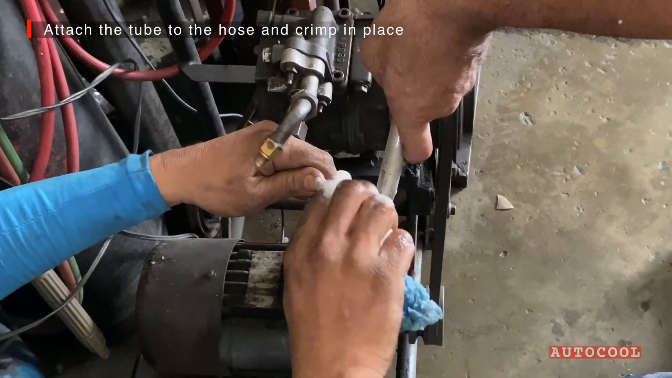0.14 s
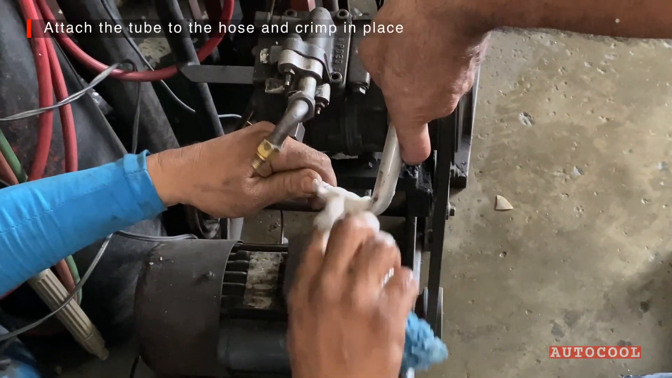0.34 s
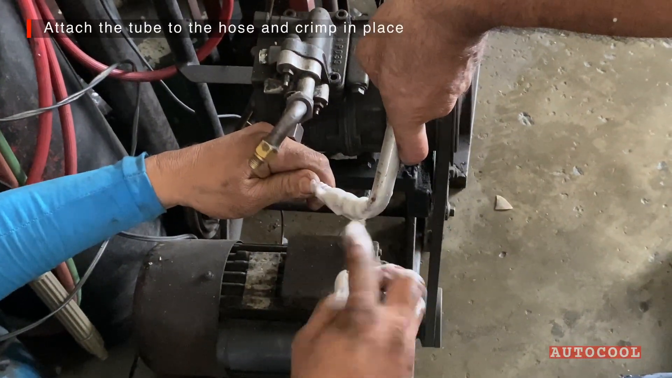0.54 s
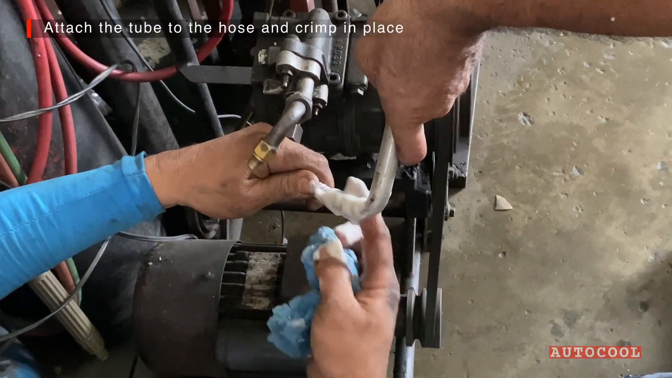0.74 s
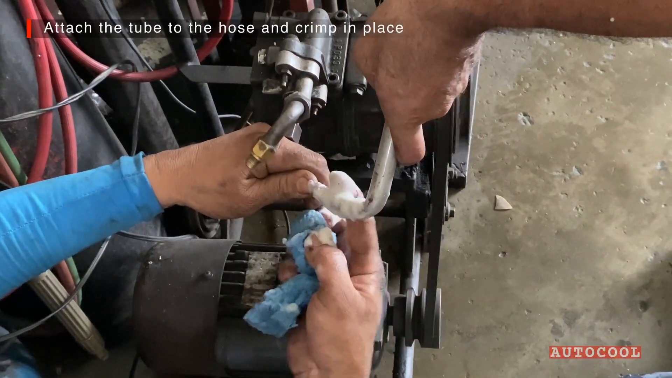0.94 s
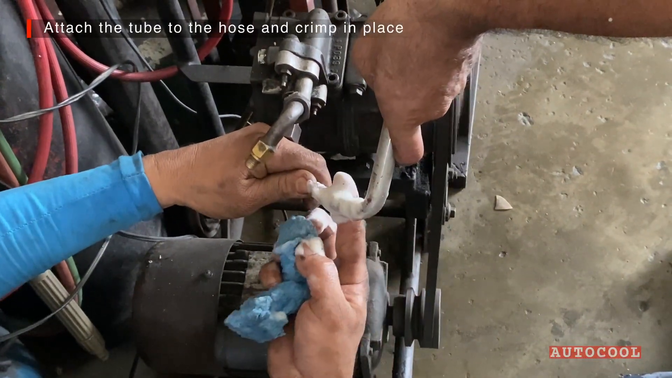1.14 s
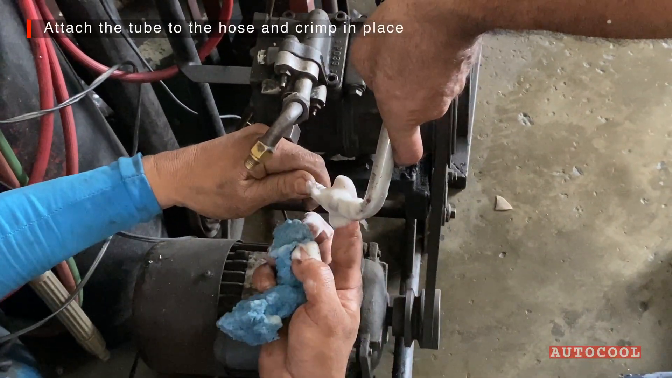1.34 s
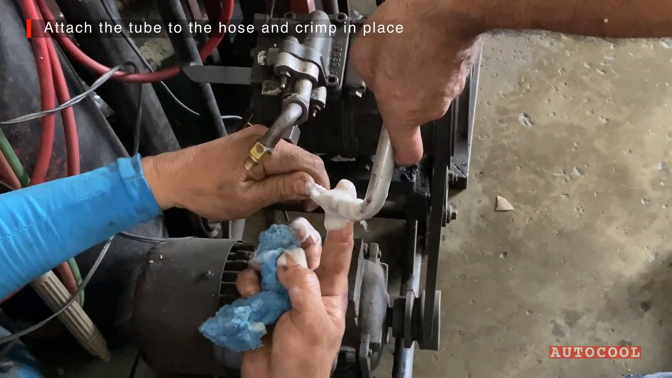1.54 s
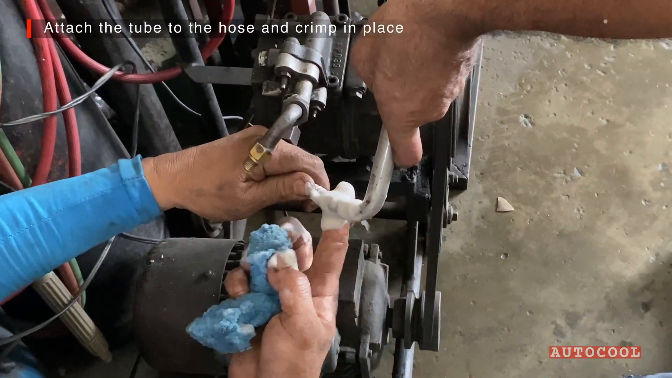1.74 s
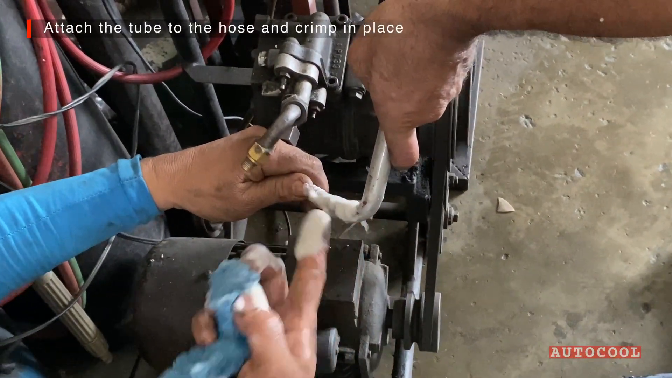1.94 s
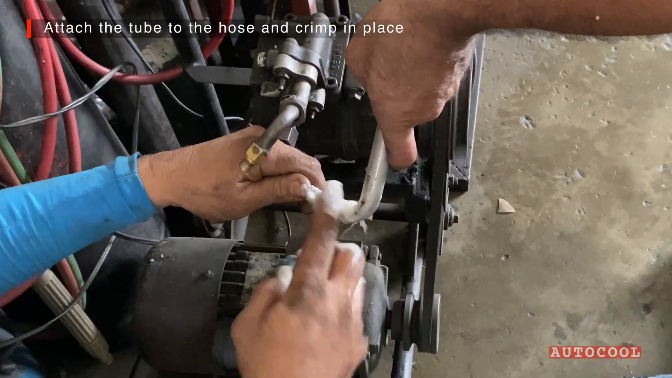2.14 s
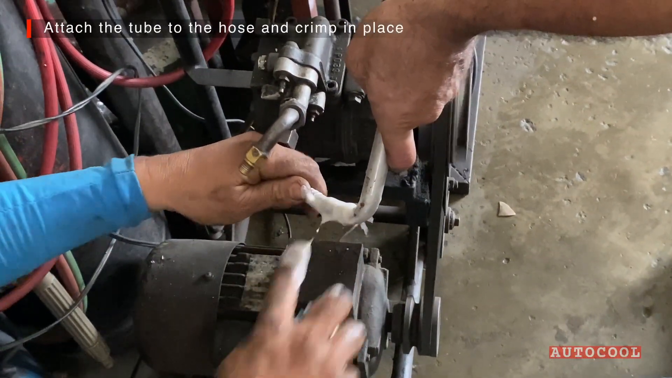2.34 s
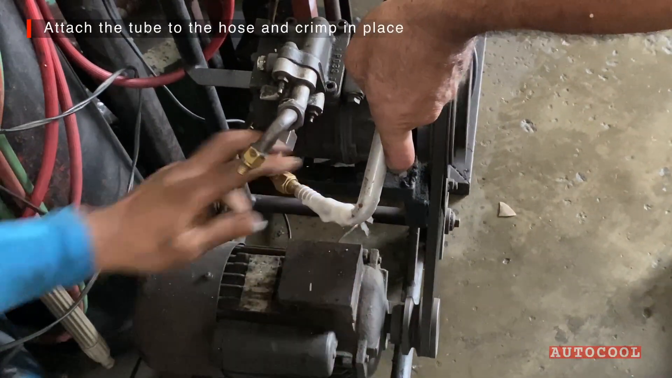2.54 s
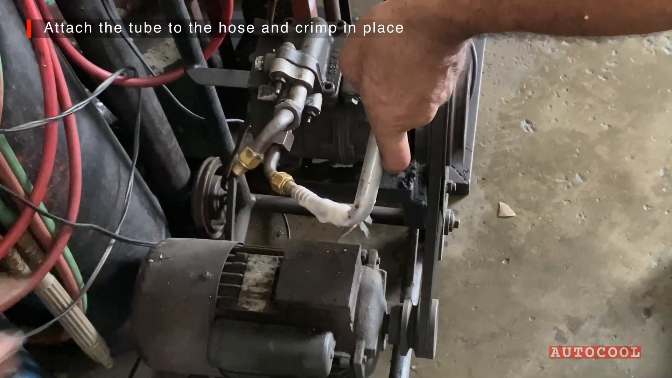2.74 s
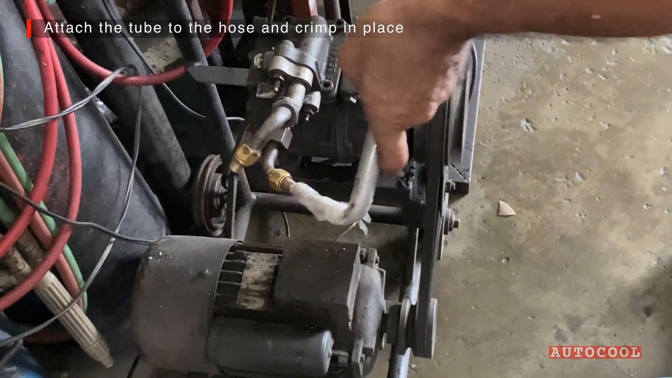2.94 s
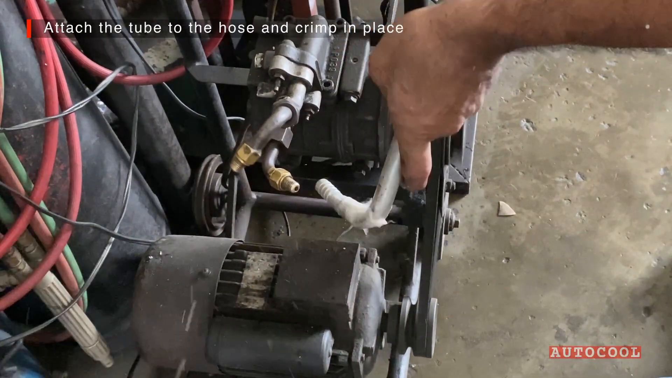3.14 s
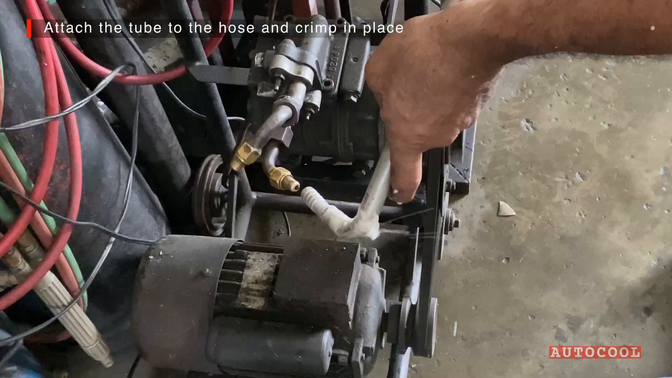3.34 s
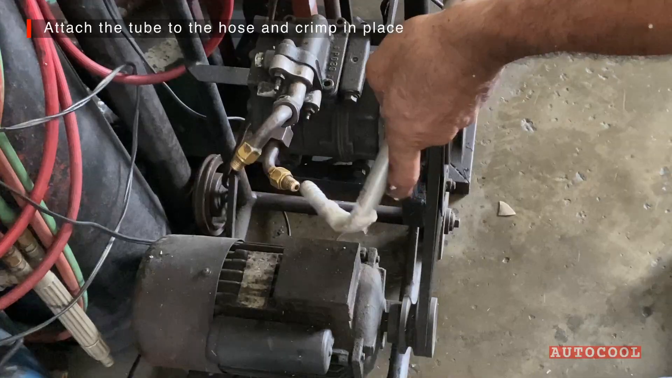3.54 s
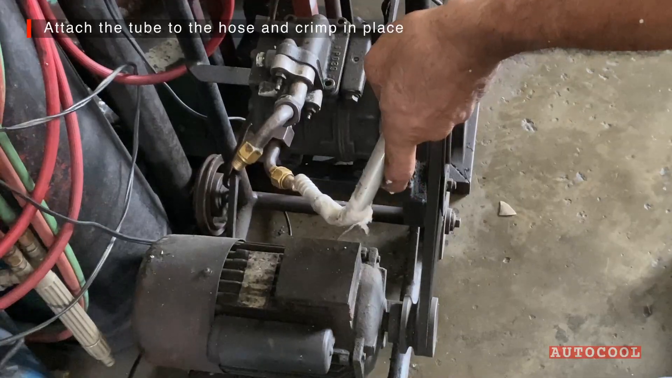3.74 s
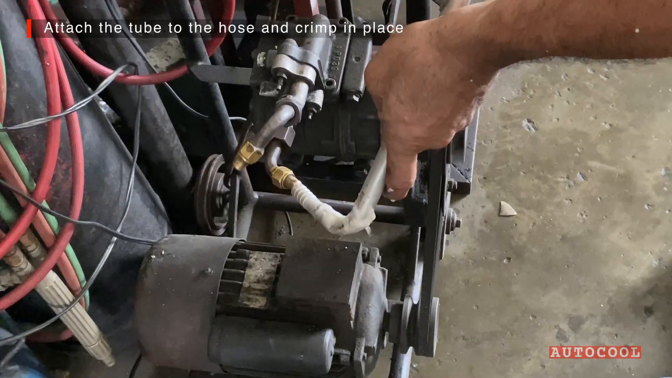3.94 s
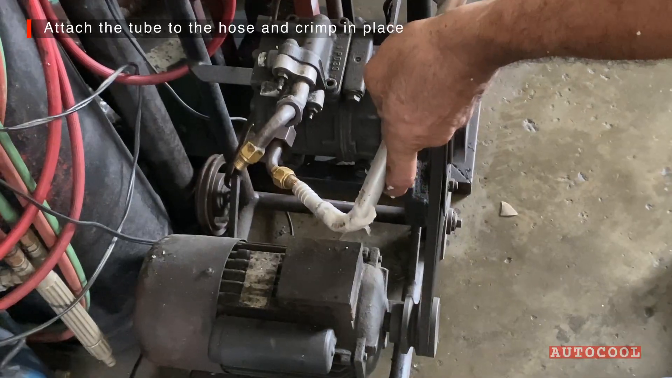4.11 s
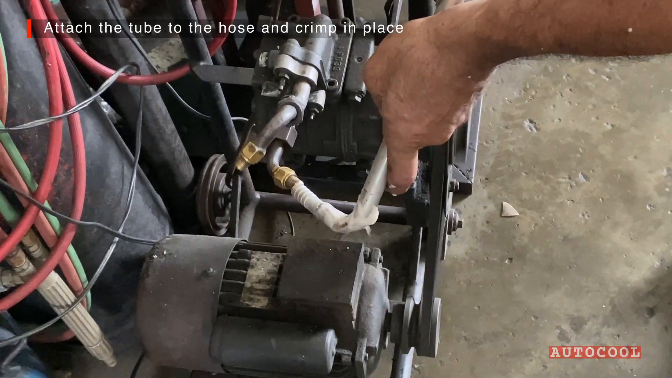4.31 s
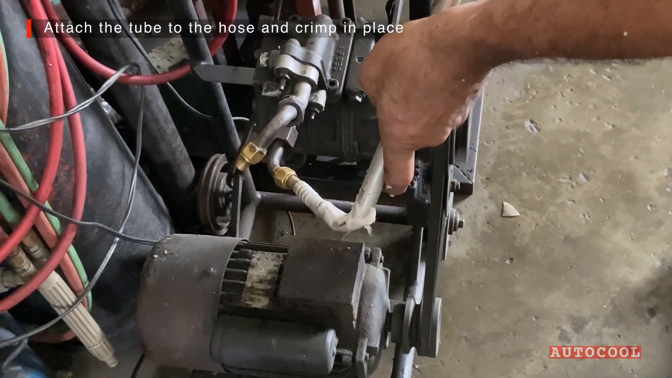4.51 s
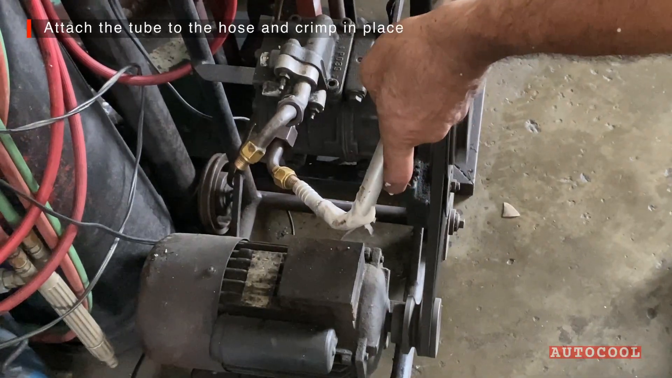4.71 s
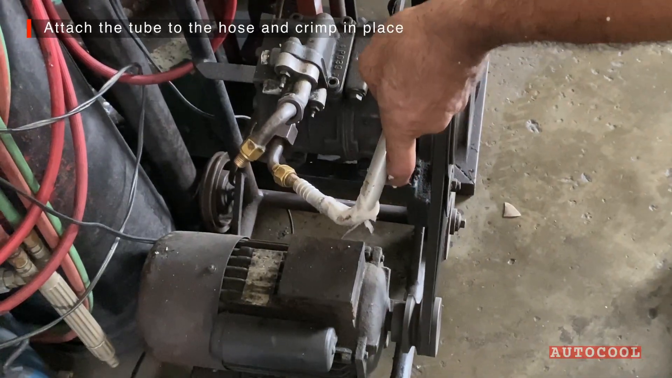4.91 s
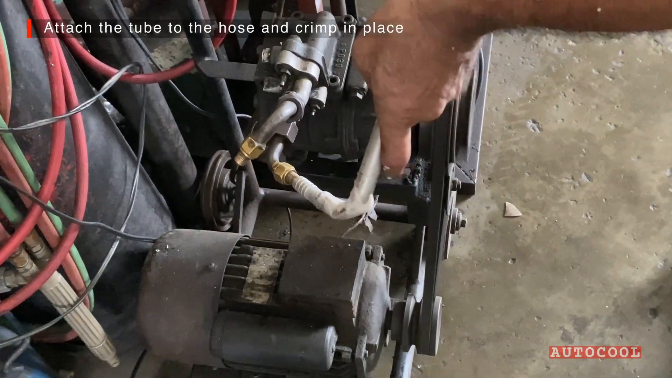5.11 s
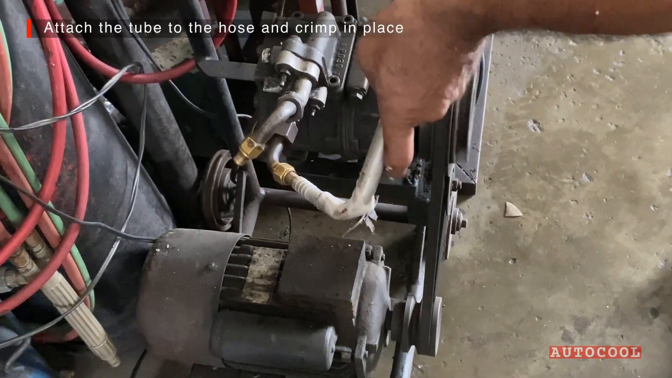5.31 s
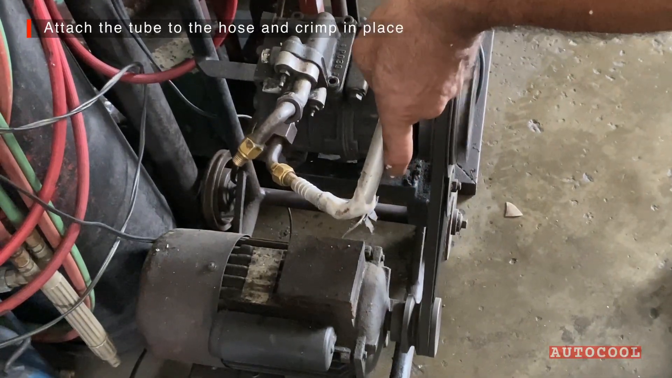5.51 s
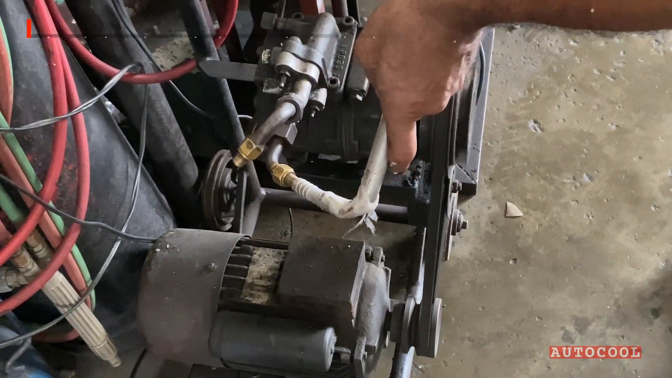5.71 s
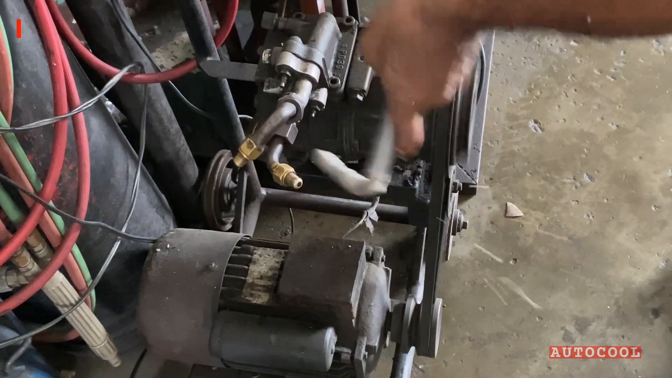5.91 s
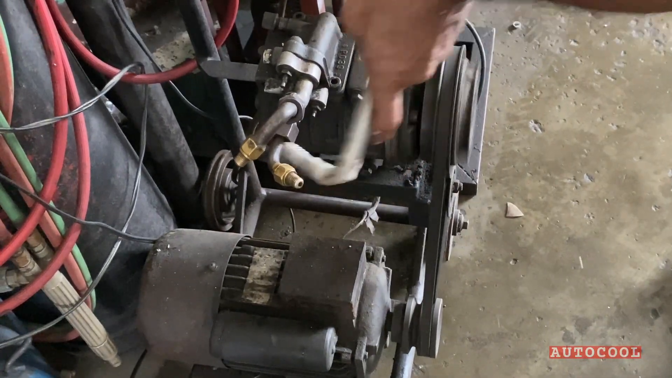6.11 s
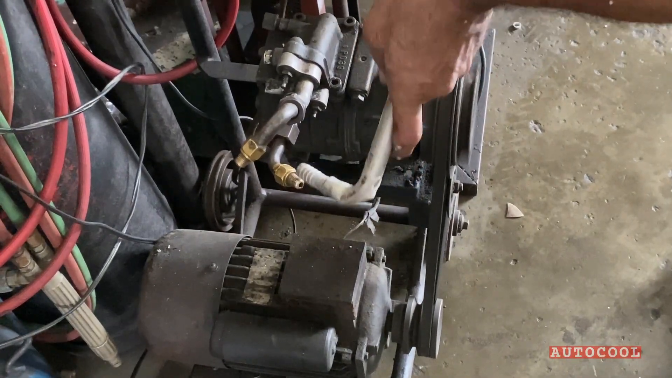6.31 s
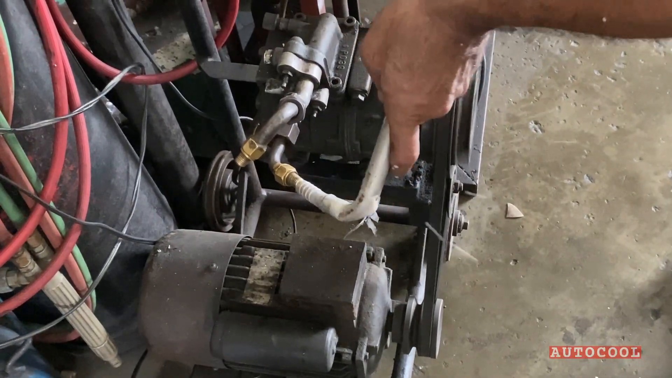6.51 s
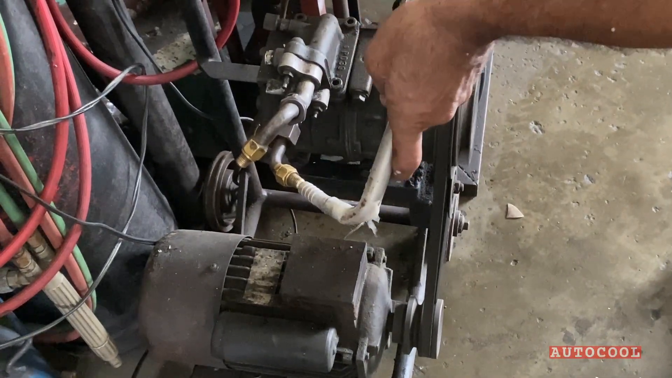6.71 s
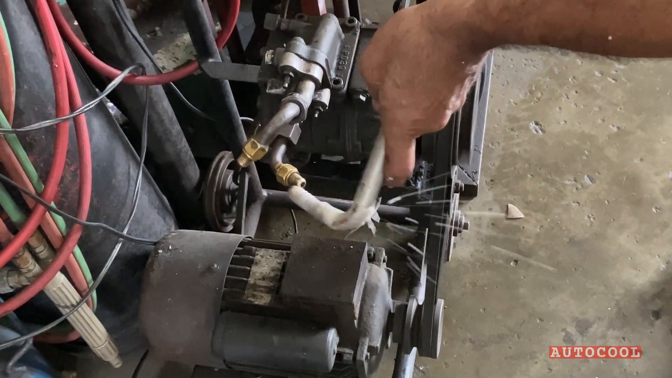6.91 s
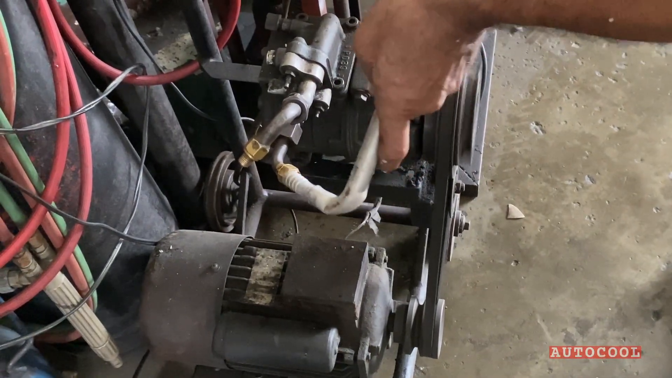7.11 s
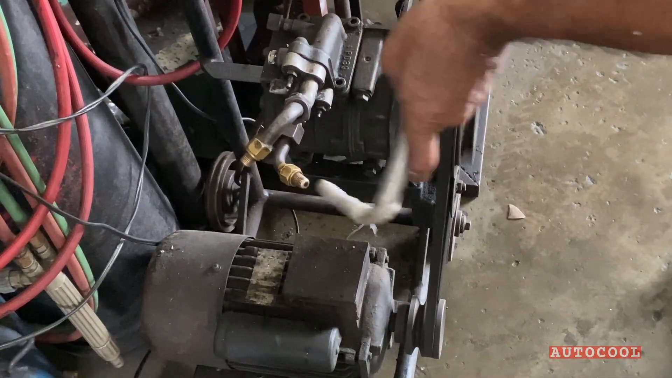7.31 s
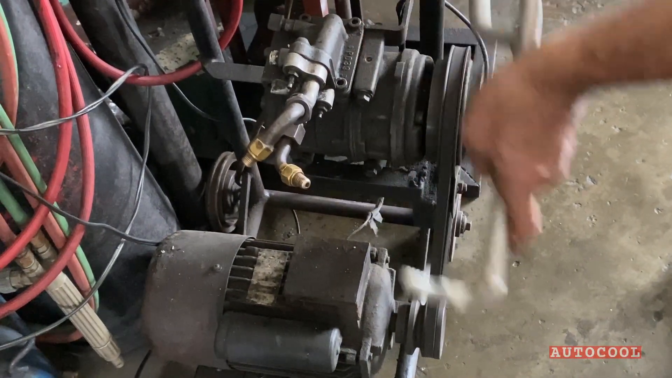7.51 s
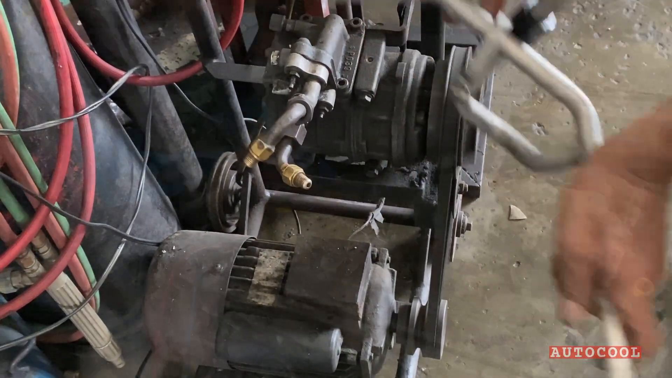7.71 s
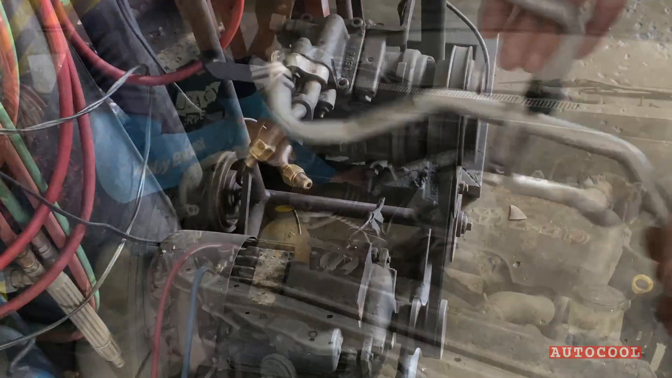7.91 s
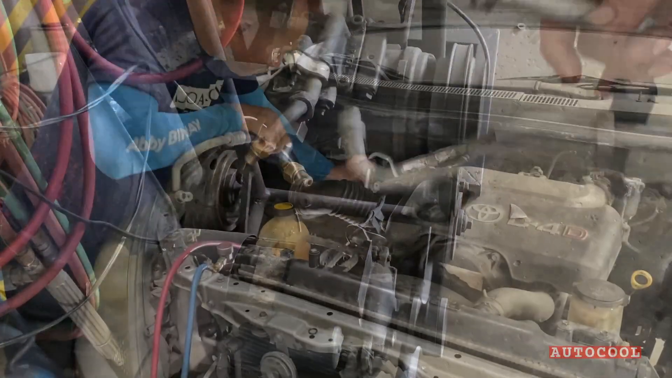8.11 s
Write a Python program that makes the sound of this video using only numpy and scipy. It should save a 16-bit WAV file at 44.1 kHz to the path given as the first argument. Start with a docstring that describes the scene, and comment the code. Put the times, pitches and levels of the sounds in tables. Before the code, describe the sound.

Compressed air hisses brightly past the mouth of a bent metal tube, spitting sharp bursts as it slips, before small metal parts clink at the end.

```python
"""A bright hiss comes first: compressed air leaks past the mouth of a bent metal tube in a workshop.
The jet is turbulent noise; the tube's resonances colour it, and shift when the tube is let go.
The nozzle spits as the tube slips on and off: short bursts of noise, one of which makes the tube sing.
Behind are rumble and motor hum (noise), a far engine (sines) and dull pops (falling tones).
At the end a wider, rumbling room fades in (noise) and small metal parts clink (ticks and ringing modes)."""
import sys
import numpy as np
from scipy import signal
from scipy.fft import rfft, irfft, next_fast_len
from scipy.io import wavfile
from scipy.ndimage import uniform_filter1d

SR = 44100
rng = np.random.default_rng(int(sys.argv[2]) if len(sys.argv) > 2 else 0)


def put_to_file(sound):
    """Save the sound as 16-bit audio at rate SR, in the file named by the first command-line argument."""
    columns = np.atleast_2d(sound).T  # one column per channel
    safe = np.clip(columns, -1, 1)
    whole_steps = np.round(safe * 32767)
    wavfile.write(sys.argv[1], SR, whole_steps.astype(np.int16))


N = 359415
SIZE = next_fast_len(N)  # transform length, samples
HZ = np.arange(SIZE // 2 + 1) * SR / SIZE
TIME = np.arange(N) / SR  # s
# duller hiss below SPLIT_HZ, bright hiss above, treble edge from EDGE_HZ, top of the sound at TOP_HZ
SPLIT_HZ, EDGE_HZ, TOP_HZ = 7980, 13200, 15750


def undb(db):
    """Decibel law: the amplitude gain of a level in dB."""
    return np.exp(np.asarray(db) * (np.log(10) / 20))


def level_over_time(points):
    """Linear interpolation in dB: gain over time from (t/s, level/dB) points."""
    return undb(np.interp(TIME, *np.transpose(points)))


def colour(points):
    """Spectral envelope: gain over log frequency from (f/Hz, level/dB) points."""
    hz, db = np.transpose(points)
    return undb(np.interp(np.log(HZ + 1), np.log(hz), db))


def peaks(modes):
    """Incoherent superposition: resonances (f/Hz, width at -6 dB/Hz, level/dB) add in power."""
    power = 0
    for hz, width, db in modes:
        offset = 2 * (HZ - hz) / width
        power = power + undb(2 * db) / (1 + offset ** 2) ** 2
    return np.sqrt(power)


def shaped(x, gain):
    """Linear filtering: the spectrum is multiplied by a gain over frequency."""
    return irfft(rfft(x, SIZE) * gain, SIZE)[..., :N]


def walk(rate):
    """Band-limited fluctuation: random values at the given rate/Hz, joined smoothly, spread near 1."""
    steps = 16  # points per random value
    values = np.repeat(rng.standard_normal(int(N / SR * rate) + 2), steps)
    values = uniform_filter1d(uniform_filter1d(values, steps), steps)
    return 1.3 * np.interp(TIME * rate * steps, np.arange(len(values)), values)


def ripple():
    """Comb interference: echoes off nearby metal leave fine random peaks in the spectrum."""
    k = int(47.7 * N / SR)  # smoothing over about 47.7 Hz
    bumps = uniform_filter1d(uniform_filter1d(rng.standard_normal(len(HZ)), k), k)
    growth = np.clip(HZ / 4500, 0, 1)  # full depth from 4.5 kHz up
    return undb(2.2 * bumps / np.std(bumps) * growth)


def hiss(gain, lo_hz, hi_hz, flicker_db, rate, count):
    """Turbulence noise: coloured noise of rms 1 in overlapping bands that each flicker alone."""
    spectrum = rfft(rng.standard_normal(SIZE)) * gain * ripple()
    spectrum = spectrum * (HZ >= lo_hz) * (HZ < hi_hz)
    place = np.log((HZ + 1) / lo_hz) / np.log(hi_hz / lo_hz) * (count - 1)
    shares = np.clip(1 - np.abs(place - np.arange(count)[:, None]), 0, 1)
    bands = irfft((spectrum * shares).astype(np.complex64), SIZE)[:, :N]
    out = sum(band * undb(flicker_db * walk(rate)) for band in bands)
    return out / np.std(out)


def burst(s, db, rise_s, hold_s, fall_s):
    """Exponential growth and decay: climbs to its peak at s, holds, dies away; times per 20 dB."""
    away = np.clip((s - TIME) / rise_s, 0, 8) + np.clip((TIME - s - hold_s) / fall_s, 0, 8)
    return undb(db - 20 * away ** 1.2)  # a power above 1 rounds the top


# spectrum of the shop rumble: f/Hz, level/dB per Hz
RUMBLE_COLOUR = [(12, -51), (20, -25), (65, 2.5), (97, -20), (124, -1.5), (176, -8.5), (450, -11),
                 (580, -45), (990, -120)]
# motor hum: f/Hz, width/Hz, level/dB re rumble spectrum
MOTOR_HUM = (76.2, 15, 5.7)
# rumble with hum over time: t/s, level/dB
RUMBLE_LEVEL = [(0, -63), (1.9, -67), (2.3, -62.5), (3.3, -55.5), (3.7, -57.5), (4.6, -62), (6.1, -65.5),
                (8.1, -65)]


def shop():
    """Narrow-band excitation in broadband noise: a low rumble with a motor hum."""
    spectrum = np.hypot(colour(RUMBLE_COLOUR), peaks([MOTOR_HUM]))
    rumble = hiss(spectrum, 13.0, 470, 1.94, 7.4, count=6)
    return rumble * level_over_time(RUMBLE_LEVEL)


# spectrum of the wide room: f/Hz, level/dB
ROOM_COLOUR = [(25, -14), (118, 0), (172, -11), (400, -17.5), (1000, -31), (3200, -34), (5000, -40)]
# difference of the channels: f/Hz, level/dB re their sum
ROOM_SIDE = [(25, -30), (110, -22), (400, -10), (1000, 10.5)]
# the room fading in: t/s, level/dB
ROOM_LEVEL = [(7.66, -81), (7.78, -57.5), (8.15, -50.5)]


def wide_room():
    """Interchannel coherence: a rumbling room, its bass alike left and right, its middle not."""
    mid = hiss(colour(ROOM_COLOUR), 25, 5000, 1.8, 14, count=5)
    side = hiss(colour(ROOM_COLOUR), 25, 5000, 1.8, 14, count=5)
    side = shaped(side, colour(ROOM_SIDE))
    level_db = np.interp(TIME, *np.transpose(ROOM_LEVEL), left=-120)
    return (mid + side * np.array([[1], [-1]])) * undb(level_db)


# engine speed: t/s, f of the firing cycle/Hz
ENGINE_SPEED = [(6.85, 41), (7.45, 44)]
# engine orders: multiple of the firing cycle, rms level at the top of the swell/dB
FIRING_ORDERS = [(3, -70), (5, -76), (8, -73), (9, -75), (10, -77)]


def engine():
    """Harmonic synthesis: a distant engine drifts by, its firing orders swelling, wavering, fading."""
    s, hz = np.transpose(ENGINE_SPEED)
    turn = np.cumsum(np.interp(TIME, s, hz)) / SR
    swell = np.sin(np.pi * np.clip((TIME - s[0]) / (s[-1] - s[0]), 0, 1))
    out = np.zeros(N)
    for k, db in FIRING_ORDERS:
        gain = np.sqrt(2) * undb(db + 2 * walk(7.4))
        out += gain * np.sin(2 * np.pi * (k * turn + rng.random()))
    return swell * out


# pops: t/s, level/dB, start f above the end/Hz, end f/Hz, turns that set the glide,
# time to the peak and decay/s, late ring level/dB re pop
PRESSURE_POPS = [(.87, -56, 600, 45, 1.4, .006, -14), (2.2225, -30, 2000, 39.5, 1.7, 0.0028, -17.5),
                 (2.826, -33.5, 2400, 54.7, 1.4, 0.0026, -10), (2.9082, -15, 2800, 770, 8, 0.0013, -23),
                 (4.67, -56.5, 400, 45, 1.4, .008, -10)]


def pops():
    """Transient with a downward chirp: highs first, the pitch drops fast, a ring at the end pitch follows."""
    out, u = np.zeros(N), np.arange(SR // 5) / SR
    boom_s = .027  # time to the top of the late ring
    for s, db, start_hz, end_hz, turns, decay, boom_db in PRESSURE_POPS:
        flutter = undb(4 * walk(250)[:len(u)])
        turn = end_hz * u + turns * np.log(1 + u * start_hz / turns)
        attack = (u / decay) * np.exp(1 - u / decay)
        # a weak tail lasts five times longer and flutters
        tail = undb(-17) * flutter * (u / decay / 5) * np.exp(1 - u / decay / 5)
        snap = (attack + tail) * np.sin(2 * np.pi * turn)
        boom = (u / boom_s * np.exp(1 - u / boom_s)) ** 2 * np.sin(2 * np.pi * end_hz * u)
        out[int(s * SR):int(s * SR) + len(u)] += undb(db) * (snap + undb(boom_db) * boom)
    return out


# strikes: t/s, level/dB, tick level/dB re ring
CLINK_STRIKES = [(7.8755, -36, 1), (7.880, -36, 7), (7.887, -37, 0), (7.898, -35, -5), (7.9074, -39, 0),
                 (7.917, -40, 0), (7.9339, -41, 17), (7.937, -36, 9), (7.9824, -44, -5)]
# modes of the small parts: f/Hz, level/dB, time to fall 60 dB/s
METAL_MODES = [(1280, -26, 0.03), (2610, -8.5, 0.032), (3540, -6, 0.033), (4150, -9, .03),
               (4670, -12.5, 0.035), (6100, -14, .012)]


def clinks():
    """Modal synthesis: small metal parts rattle, a bright tick and a short ring, each strike different."""
    out, u = np.zeros(N + SR), np.arange(SR // 5) / SR
    bright = signal.butter(3, (6200, 12500), "band", fs=SR, output="sos")
    for s, db, tick_db in CLINK_STRIKES:
        tick = rng.standard_normal(len(u)) * np.exp(-u / .0025)
        clink = signal.sosfilt(bright, tick) * undb(tick_db)
        for hz, mode_db, t60 in METAL_MODES:
            detune, strike = rng.standard_normal(2)
            mode_hz = hz * (1 + 0.0084 * detune)
            ring = np.sin(2 * np.pi * mode_hz * u) * 1000 ** (-u / t60)
            clink = clink + undb(mode_db + 3.5 * strike) * ring
        out[int(s * SR):int(s * SR) + len(u)] += undb(db) * clink
    return out[:N]


# spectrum of the jet, in the leak and the spurts: f/Hz, level/dB
JET_COLOUR = [(8000, 0), (9000, -1), (10500, 0), (12000, 1), (12900, -1), (13300, -3), (16000, -7)]
# edge tone of the free tube: f/Hz, width/Hz, level/dB re jet
EDGE_TONE = (11930, 250, -12)
# steady jet from 8 kHz to the treble edge: t/s, level/dB
LEAK_JET_LEVEL = [(0.04, -31.5), (0.8, -32), (1.05, -37), (1.4, -32), (1.55, -30.5), (1.68, -36.5),
                  (1.95, -31.5), (2.44, -32.5), (2.52, -36.5), (2.8, -41), (3.7, -41.5), (3.85, -38.5),
                  (4.5, -38.5), (4.7, -41), (5.3, -39), (5.55, -44), (5.7, -38), (6.2, -41.5), (7.1, -42),
                  (7.8, -40), (8.1, -45.5)]


def leak_jet():
    """Free-jet turbulence: steady bright noise, with an edge tone once the tube is free."""
    edge_db = np.interp(TIME, (2.8, 3.1), [-5.5, -9.5])  # treble edge re jet
    edge_db = edge_db + 4.8 * np.exp(-((TIME - 1.4) / 0.24) ** 2)  # the treble flares briefly
    jet = hiss(colour(JET_COLOUR), SPLIT_HZ, EDGE_HZ, 1.0, 11, count=5)
    edge = hiss(colour(JET_COLOUR), EDGE_HZ, 15800, 0.86, 14, count=3)
    whistle = undb(EDGE_TONE[2]) * hiss(peaks([EDGE_TONE]), SPLIT_HZ, 16500, 1.8, 6, count=2)
    out = jet + undb(edge_db) * edge + freedom() * whistle
    return out * level_over_time(LEAK_JET_LEVEL) * undb(0.64 * walk(9.7))


def freedom():
    """Change of boundary condition: 0 while the tube is held in the hand, 1 once it is free."""
    return np.clip((TIME - 2.21) / 0.057, 0, 1)


# tube resonances, held and free: f/Hz, width/Hz, level/dB (used relative to the strongest)
HELD_MODES = [(564, 130, 4.5), (896, 110, 0.5), (1337, 46, -3.5), (1578, 80, -1), (2510, 300, 0.5),
              (3720, 200, -4.5), (4770, 790, -8), (5940, 800, -7), (6750, 180, 1.5)]
FREE_MODES = [(606.7, 39, 7), (1327, 12, 6), (1554, 118, 3), (2234, 110, -11), (2490, 790, -2),
              (3700, 300, 1.5), (4150, 11, -19), (4830, 590, -5), (5950, 86, -2.5)]
# noise between the resonances: f/Hz, level/dB re strongest resonance
BETWEEN_MODES = [(430, -71), (480, -9), (1600, -12), (1750, -16), (2050, -14.5), (2400, -9.5),
                 (4300, -16.5), (6800, -11), (8000, -30)]
# steady tube: t/s, level above 1.8 kHz/dB, level below/dB
LEAK_TUBE_LEVEL = [(0.04, -41.5, -47.5), (0.55, -41.5, -48), (1.1, -46, -49), (1.5, -42.5, -48.5),
                   (1.7, -47.5, -49.5), (2.2, -46, -50), (2.4, -40, -48.5), (2.8, -41.5, -44.5),
                   (3.3, -40, -45), (3.7, -41, -46), (4.45, -41.5, -47.5), (4.7, -45, -49), (5.3, -46, -48),
                   (6.1, -48.5, -50), (6.7, -47.5, -50.5), (7.1, -50, -51), (8.1, -50, -52)]


def leak_tube():
    """Resonator driven by turbulence: the tube colours the leak; letting go shifts its modes."""
    s, upper_db, lower_db = np.transpose(LEAK_TUBE_LEVEL)
    upper_gain = undb(np.interp(TIME, s, upper_db))
    lower_gain = undb(np.interp(TIME, s, lower_db))
    free = freedom()
    out = np.zeros(N)
    for modes, share in ((HELD_MODES, 1 - free), (FREE_MODES, free)):
        strongest_db = max(db for _, _, db in modes)
        tube = np.hypot(peaks(modes) / undb(strongest_db), colour(BETWEEN_MODES))
        upper = hiss(tube, 1837, SPLIT_HZ, 1.06, 14, count=7) * upper_gain
        lower = hiss(tube, 380, 1796, 0.51, 12, count=5) * lower_gain
        out += np.sqrt(share) * (upper + lower)  # equal-power crossfade
    return out


# spurts: peak t/s, jet level/dB, rise/s per 20 dB, hold/s, fall/s per 20 dB,
# then levels re jet: 8-10 kHz/dB, upper tube/dB, above 13 kHz/dB
AIR_SPURTS = [(2.92, -18, .02, .012, .013, -3, 4, -4.5), (2.967, -25, .04, 0.005, .085, 1, -1, -3),
              (3.31, -35, .08, .12, .25, 3, 0.5, -9), (3.54, -32, .2, .04, .08, -1, -2, -7.5),
              (5.004, -18, .027, .01, .033, -7.5, -10, -3), (5.04, -27, .03, 0, .1, -4, -7, -6),
              (5.33, -49, .1, 0, .1, -2, -11, -1), (5.765, -31, .04, .02, .05, -1, -13, 0),
              (5.808, -20, .05, .003, .065, -1, -10.5, -3), (6.63, -40.5, .12, 0, .14, -2, -14, -3),
              (6.86, -40, .2, 0, .15, -2, -12, -2), (7.3, -36, .04, .01, .065, -1, -12, -6)]
# spectrum of the tube in a spurt: f/Hz, level/dB
SPURT_TUBE_COLOUR = [(600, -16.5), (1500, -5), (1850, -10), (2300, 1), (3000, -2), (3600, -4.5), (4400, -1),
                     (5000, -1), (5500, 1.5), (6200, -2), (8000, 3)]
# modes of the singing tube: f/Hz, width/Hz, level/dB
SINGING_MODES = [(1500, 1200, -21), (2220, 130, -13.5), (3100, 1200, -21), (3870, 120, -11),
                 (4750, 1300, -10), (7230, 70, 0), (8360, 90, -5), (9300, 400, -14)]
# the singing: t/s, level/dB, rise/s per 20 dB, hold/s, fall/s per 20 dB
SINGING = (3.34, -25, .09, .09, .2)


def spurts():
    """Intermittent turbulence: the slipping tube lets out bursts of air, torn by quick gusts."""
    powers = 0
    for row in AIR_SPURTS:
        band_db = np.array([0, *row[5:]])[:, None]
        powers = powers + burst(*row[:5]) ** 2 * undb(2 * band_db)
    jet_gain, low_gain, tube_gain, edge_gain = np.sqrt(powers)
    low = hiss(colour(JET_COLOUR), SPLIT_HZ, 10000, 0.95, 40, count=2)
    jet = hiss(colour(JET_COLOUR), 10000, EDGE_HZ, 0.94, 40, count=2)
    edge = hiss(colour(JET_COLOUR), EDGE_HZ, TOP_HZ, 1.0, 25, count=2)
    tube = hiss(colour(SPURT_TUBE_COLOUR), 1800, SPLIT_HZ, 1.5, 60, count=8)
    lower_tube = hiss(colour(SPURT_TUBE_COLOUR), 560, 1800, 3.0, 40, count=4)
    tube = tube + undb(-24) * lower_tube
    tube_gain = np.roll(tube_gain, int(.004 * SR))  # the tube answers 4 ms after the jet
    air = jet_gain * jet + low_gain * low + edge_gain * edge + tube_gain * tube
    # in the long spurt the jet blows across the mouth and the tube sings
    sing = hiss(peaks(SINGING_MODES), 660, 9700, 1.6, 23.96, count=6) * burst(*SINGING)
    return undb(1.2 * walk(150)) * air + sing


def phase_redrawn(x):
    """Phase randomisation: same colours and swells, every phase redrawn, making a blurred, unlike copy."""
    cells = signal.stft(x, nperseg=512)[2]
    phase = 2 * np.pi * rng.random(cells.shape)
    return signal.istft(cells * np.exp(1j * phase), nperseg=512)[1][:N]


# phase of the right channel behind the left: f/Hz, lag/half turns
CHANNEL_TURN = [(0, 0), (1200, 0), (1450, -.3), (1750, 0), (2050, 0), (2300, .17), (2600, .19), (2900, 0),
                (3900, 0), (4400, .13), (4900, .02), (5500, .03), (5900, .45), (6900, 1), (7600, 1),
                (8000, 1.2), (10200, 2), (10800, 2), (13150, 3), (14000, 3), (15800, 3.75), (22050, 5)]


def scene():
    """Interchannel phase: one near sound for both channels, turned apart, within the wide room."""
    near = shop() + engine() + pops() + clinks() + leak_jet() + leak_tube() + spurts()
    turn = np.pi * np.interp(HZ, *np.transpose(CHANNEL_TURN))
    pair = shaped(near, np.exp(.5j * turn * np.array([[1], [-1]])))
    # the channels are a little unlike where the turn is no whole number of half turns
    unlike = shaped(np.array([phase_redrawn(near), phase_redrawn(near)]), np.sin(turn))
    return pair + undb(-5) * unlike + wide_room()


def record(dry):
    """Dynamic compression: the phone ducks just after loud bursts, rounds peaks and cuts the top."""
    threshold_db, ratio, duck_s, peak_s, clip = -25, 2.6, 0.1, .012, .9
    power = uniform_filter1d(np.mean(dry ** 2, axis=0), int(peak_s * SR))
    peak = power ** 2  # squared so that peaks outweigh the rest
    k = int(duck_s * SR)
    for _ in range(2):  # averages that look back only
        peak = uniform_filter1d(peak, k, origin=(k - 1) // 2)
    excess = np.sqrt(peak.clip(0)) / undb(2 * threshold_db)
    ducked = dry * (1 + excess) ** (-(1 - 1 / ratio) / 2)
    rounded = clip * np.tanh(ducked / clip)
    low_pass = signal.ellip(12, .2, 80, TOP_HZ, fs=SR, output="sos")
    return signal.sosfilt(low_pass, rounded)


dry = scene()
out = record(dry)
put_to_file(out)
```